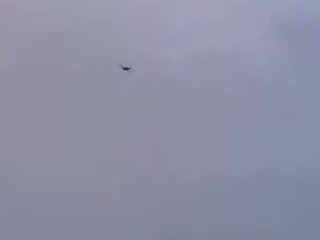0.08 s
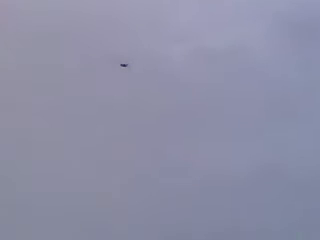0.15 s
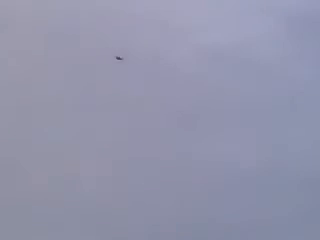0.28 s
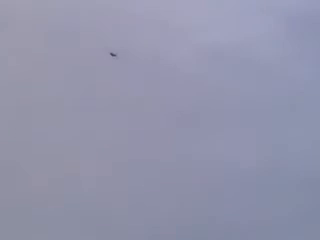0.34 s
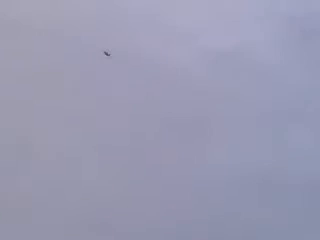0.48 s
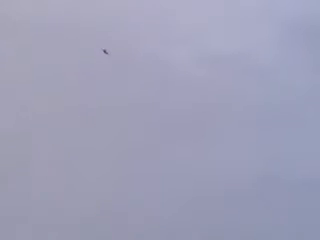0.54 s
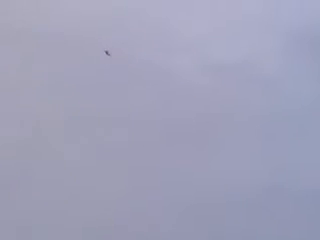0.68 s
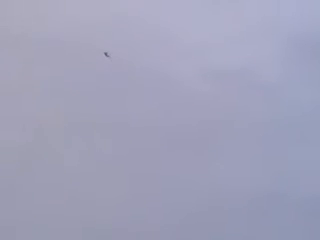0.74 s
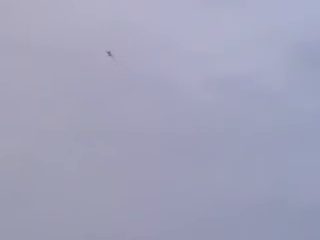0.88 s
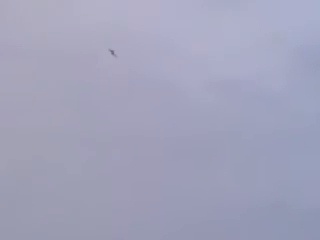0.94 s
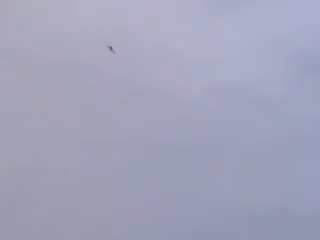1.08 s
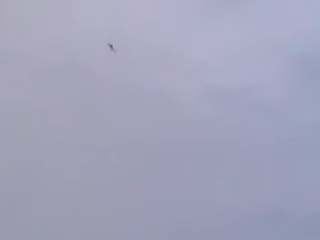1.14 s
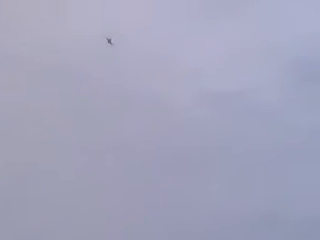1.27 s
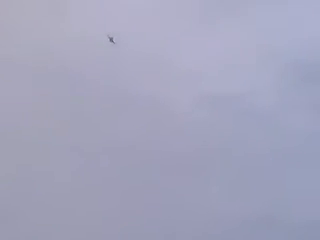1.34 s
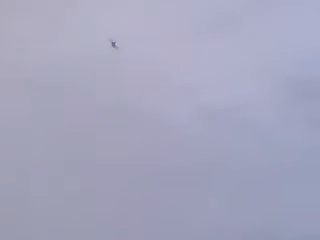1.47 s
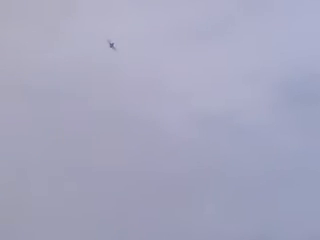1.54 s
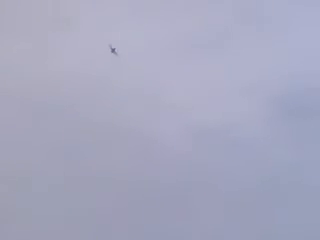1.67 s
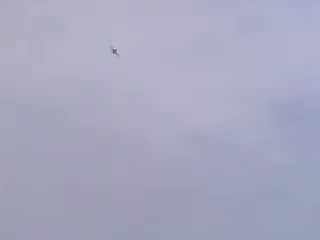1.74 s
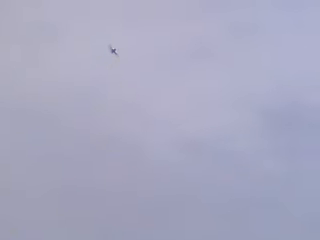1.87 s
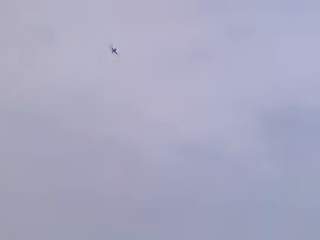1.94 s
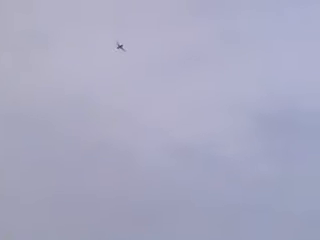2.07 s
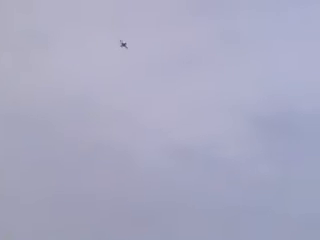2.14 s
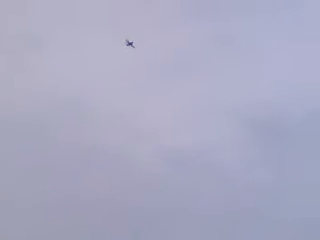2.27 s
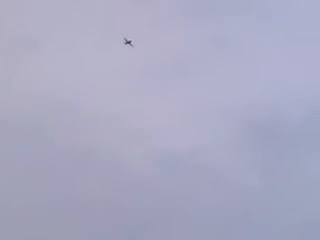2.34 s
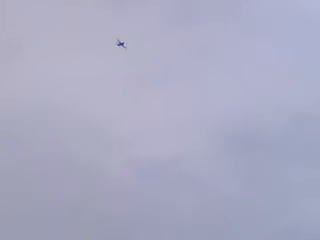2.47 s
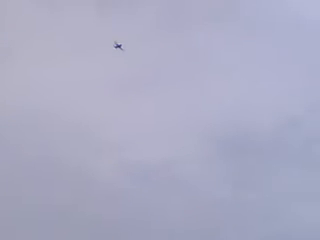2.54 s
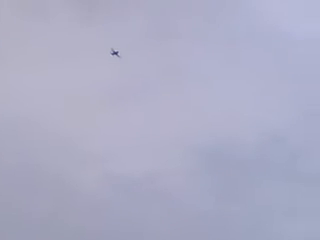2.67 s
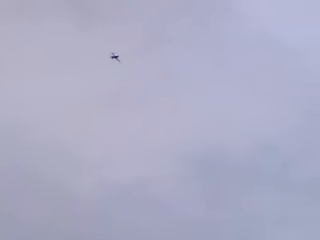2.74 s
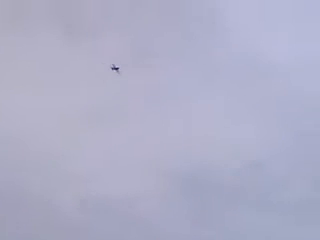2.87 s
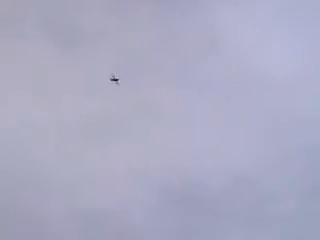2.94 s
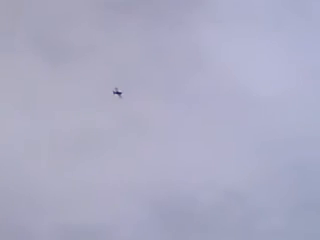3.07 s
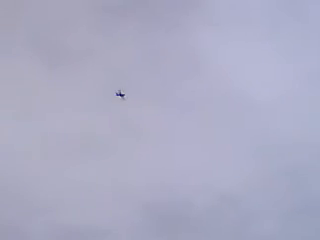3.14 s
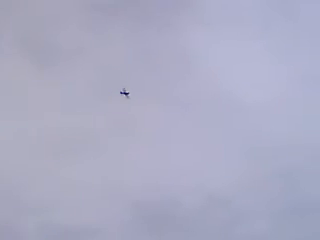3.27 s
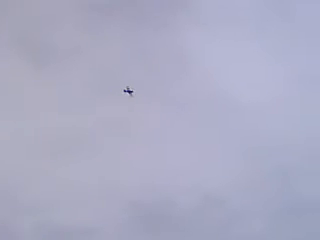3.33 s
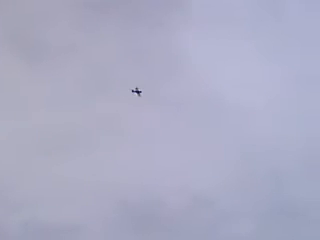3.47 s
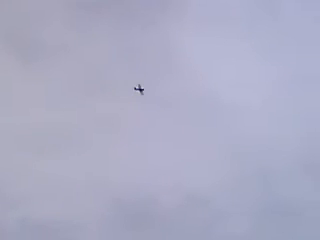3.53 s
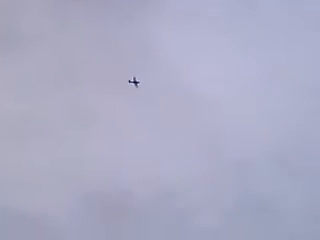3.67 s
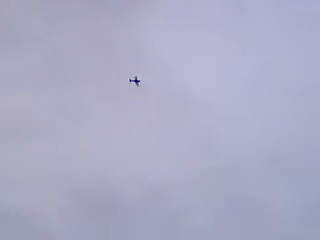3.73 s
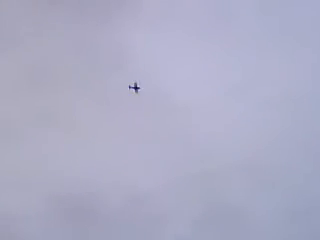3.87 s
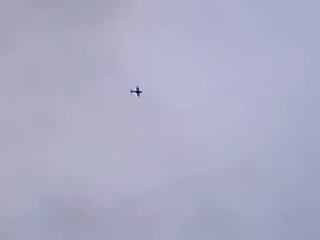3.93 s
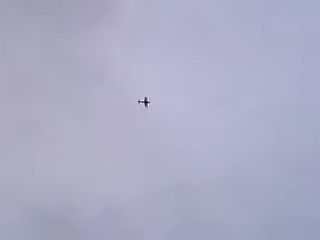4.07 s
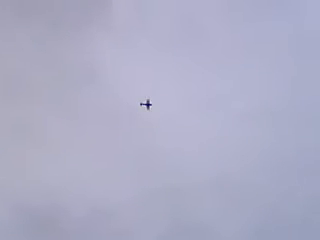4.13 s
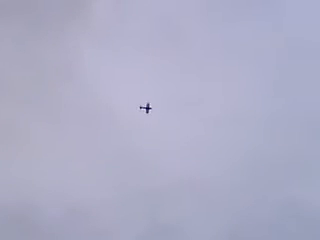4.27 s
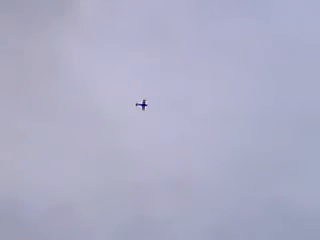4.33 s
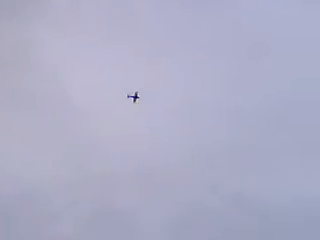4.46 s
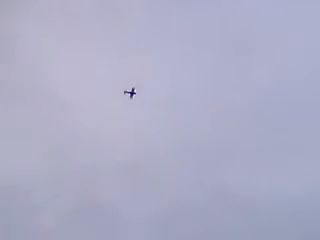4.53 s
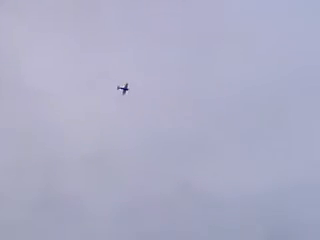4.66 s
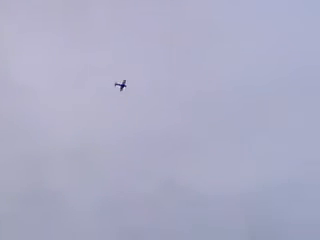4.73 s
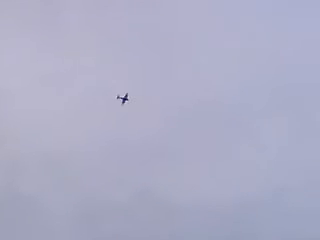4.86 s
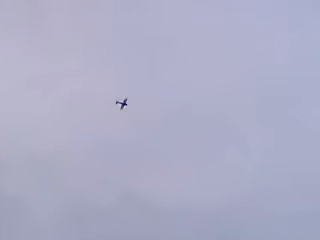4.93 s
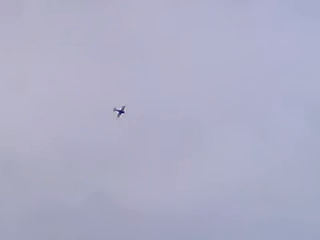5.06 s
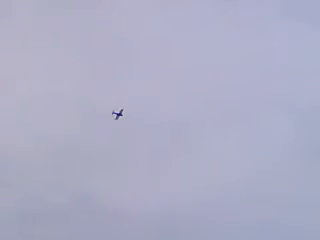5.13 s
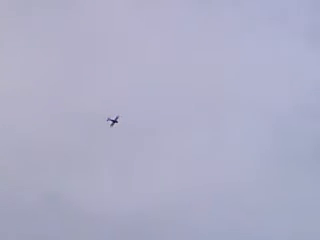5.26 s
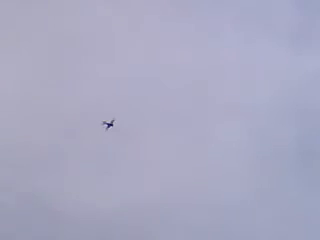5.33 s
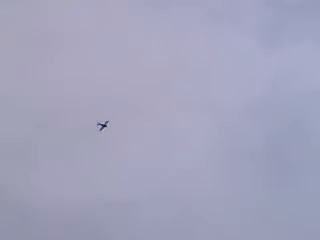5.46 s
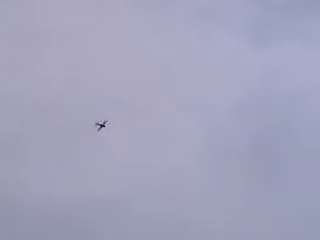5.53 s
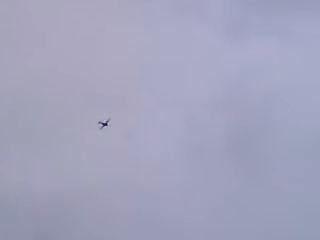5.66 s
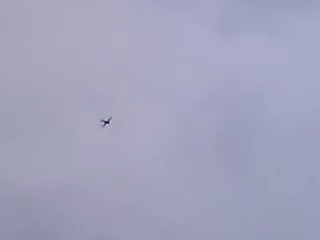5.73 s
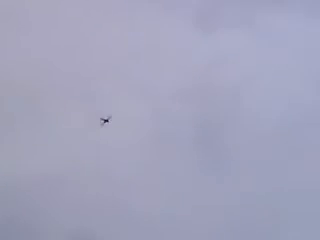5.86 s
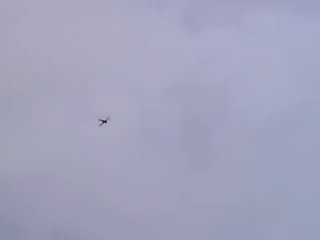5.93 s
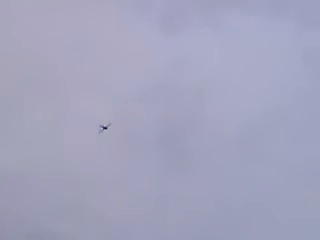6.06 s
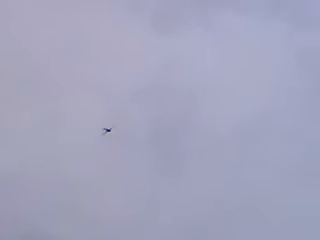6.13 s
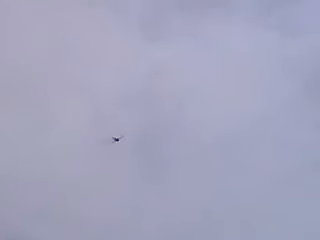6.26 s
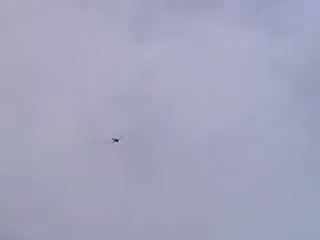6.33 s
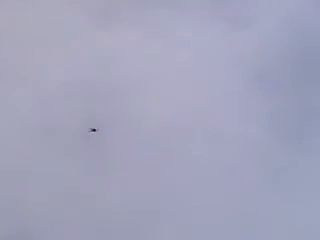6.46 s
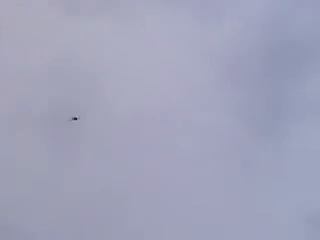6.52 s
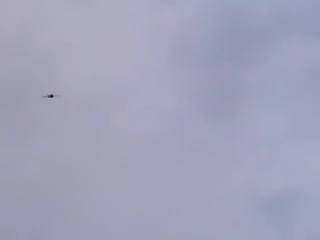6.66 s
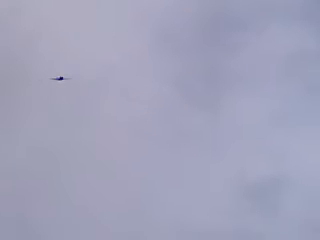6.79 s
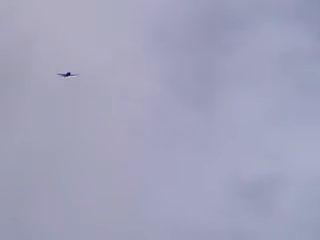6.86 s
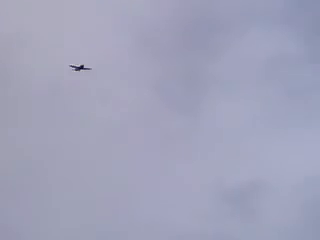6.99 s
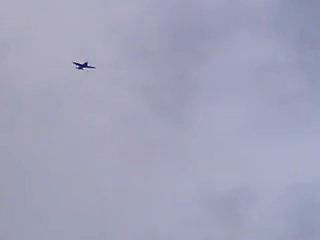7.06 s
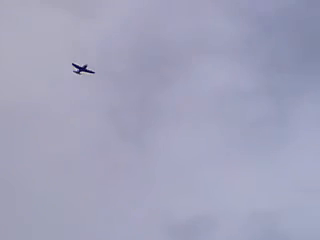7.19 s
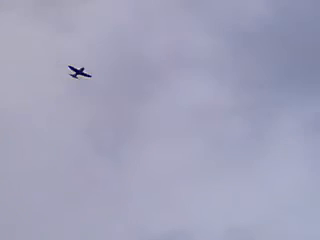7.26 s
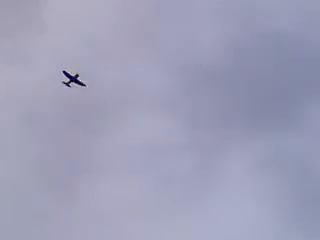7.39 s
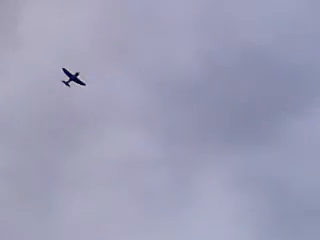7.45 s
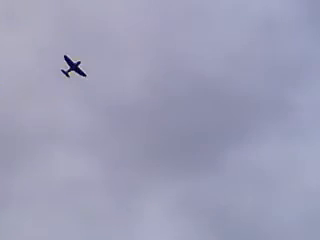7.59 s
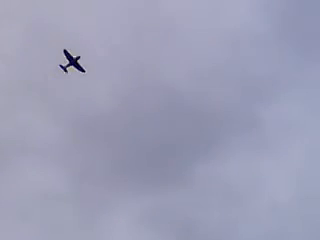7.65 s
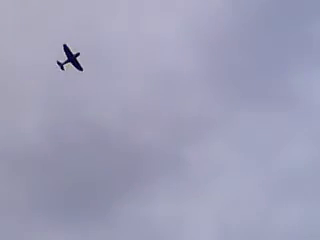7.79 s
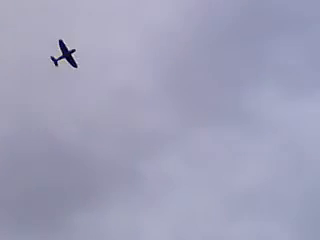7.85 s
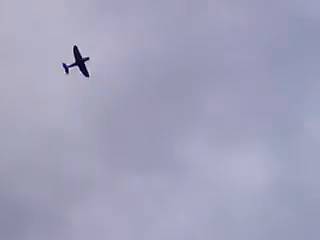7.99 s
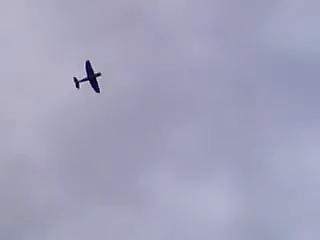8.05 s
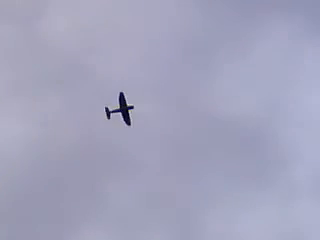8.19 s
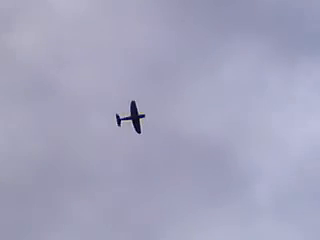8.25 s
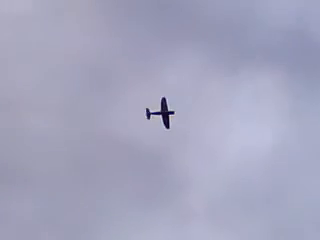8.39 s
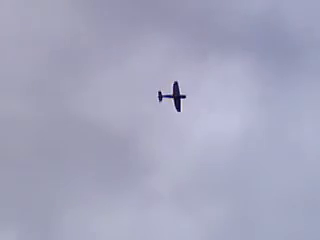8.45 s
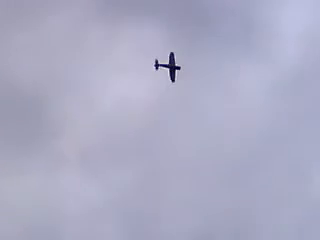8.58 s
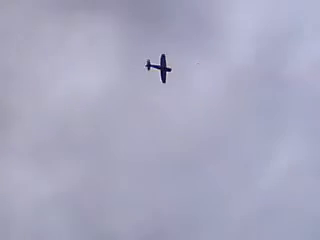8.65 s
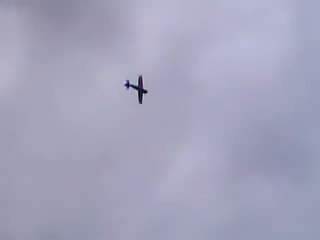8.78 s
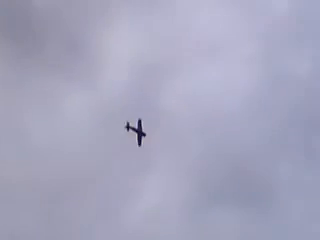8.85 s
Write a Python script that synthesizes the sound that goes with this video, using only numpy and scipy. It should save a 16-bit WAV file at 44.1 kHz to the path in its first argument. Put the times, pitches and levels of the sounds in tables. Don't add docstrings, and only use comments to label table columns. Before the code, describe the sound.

Outdoors over a field, a model aeroplane's tiny two-stroke engine drones throughout: a reedy, buzzing stack of tones with raspy exhaust hiss, firing around 130 times a second. At 0 s it is moderately loud, then fades quickly by 1.2 s while its pitch slides down, reaching its lowest near 3.6 s. From 2 to 5 s it is distant and thin, wavering in strength and brightness. Brief bright flashes flicker from about 4.8 to 6.8 s as pitch climbs, peaking near 7.5 s. It swoops overhead, loudest around 7.6-8.3 s, with a deep beat and propeller snarl near 8 s, then falls in pitch and eases until 8.9 s. A ground reflection gives a hollow, shifting comb colour. Wind thumps and flutters on the small camera microphone, strongest before 1.2 s and after 6.4 s, calmer between. Faint road hum continues, with a soft muffled car near 5.8 s. Treble is sparse and limited.

```python
import sys
import numpy as np
from scipy import signal
from scipy.fft import rfft, irfft, next_fast_len
from scipy.io import wavfile
from scipy.ndimage import uniform_filter1d, map_coordinates

SR = 44100
rng = np.random.default_rng(int(sys.argv[2]) if len(sys.argv) > 2 else 0)


def transcribe(signal):
    frames = np.atleast_2d(signal).T
    limited = np.clip(frames, -1, 1)
    pcm = np.round(limited * 32767).astype(np.int16)
    wavfile.write(sys.argv[1], SR, pcm)


def undo_db(level):
    steps = np.asarray(level, float) / 20
    return 10 ** steps


N = 392931


def unit(x):
    return x / np.sqrt(np.mean(x ** 2) + 1e-20)


def along(points, hz):
    f, v = np.transpose(points)
    return np.interp(np.log(hz + 1), np.log(f + 1), v)


def curves(rows):
    s, *cols = np.transpose(rows)
    return [np.interp(np.arange(N) / SR, s, c) for c in cols]


def wobble(rate):
    knots = rng.standard_normal(int(N * rate / SR) + 4)
    return map_coordinates(knots, [np.arange(N) * rate / SR], order=2)


def stretched(db, factor):
    return db.mean() + factor * (db - db.mean())


def filtered(x, response):
    m = next_fast_len(N + 8192)
    return irfft(rfft(x, m) * response(np.fft.rfftfreq(m, 1 / SR)), m)[:N]


def noise(spectrum):
    return unit(filtered(rng.standard_normal(N), lambda hz: undo_db(along(spectrum, hz))))


def swells(s, half_s, db):
    t = np.arange(0, N + 64, 64) / SR
    power = sum(undo_db(2 * d) * np.exp(-((t - c) / h) ** 2) for c, h, d in zip(s, half_s, db))
    return np.interp(np.arange(N) / SR, t, power)


def engine():
    # time in seconds, firing rate as heard in Hz, bent by the plane's speed.
    pitch = [(0.0, 136.4), (0.375, 134.7), (1.125, 132.2), (1.5, 131.3), (2.25, 128.6), (3.0, 127.7),
             (3.625, 126.6), (4.125, 128.5), (4.55, 131.0), (5.03, 132.0), (5.35, 134.6), (5.9, 143.5),
             (6.6, 153.9), (7.2, 160.7), (7.5, 162.3), (8.0, 157.4), (8.3, 152.4), (8.91, 140.5)]
    # time in seconds, loudness set by distance in dB, treble lift while the pipe faces the field in dB.
    flight = [(0.0, -34.5, 0.5), (0.9, -39, 5), (1.15, -45.5, 4), (1.5, -46, 5.5), (2.0, -45, -8),
              (2.4, -49, -8.5), (2.85, -46.5, 3), (3.6, -43, 2), (4.0, -40.5, -8), (4.45, -42, -6),
              (4.8, -38.5, -5), (5.25, -42.5, 3.5), (5.65, -40.5, -1), (6.3, -34.5, -2.5), (7.1, -32.5, -6),
              (7.6, -26.5, -2.5), (8.3, -25, -2), (8.91, -31.5, 4.5)]
    turns = np.cumsum(curves(pitch)[0] * (1 + 0.00071 * wobble(60))) / SR
    loud_db, lift_db = curves(flight)
    flash_db = pipe_flashes()
    buzz = shaft_orders(turns, loud_db, lift_db, flash_db)
    buzz = buzz + exhaust_hiss(turns, loud_db, lift_db + flash_db)
    return buzz + ground(buzz, soft_hz=2900) + np.sqrt(2) * drone(turns)


def pipe_flashes():
    # time in seconds, lift in dB.
    rolls = [(0.0, 5), (0.74, 2.5), (4.79, 5.5), (5.0, 5.5), (5.25, 4.5), (5.55, 6), (5.87, 7.5), (6.1, 3),
             (6.28, 4), (6.47, 4.5), (6.78, 3), (7.38, 2), (7.63, 0.5), (7.88, 4), (8.31, 3.5)]
    half_s = 0.051
    t = np.arange(N) / SR
    return sum(db * np.exp(-((t - s) / half_s) ** 2) for s, db in rolls)


def shaft_orders(turns, loud_db, lift_db, flash_db):
    # time in seconds, heading as a place between behind 0, side 1, ahead 2 and below 3.
    heading = [(1.9, 0.4), (2.8, 1.35), (4.6, 0.78), (5.9, 1.38), (6.5, 1.57), (7.2, 2), (7.6, 2.95)]
    # low, middle, whine and top order group in dB.
    group_db = [
        (6, -6.5, -0.4, -0.5),
        (3, -0.5, 1.2, -9.5),
        (0.7, 1.5, 0.4, -10.5),
        (0.5, -0.75, 0.2, -7),
    ]
    grows = [0.97, 1, 1.08, 1.177]
    lift_share = [.05, .3, .95, 1.05]
    flash_share = [.05, .2, .45, 1.3]
    top_order = 50
    ticks = np.arange(0, N, 64)
    t = ticks / SR
    aspect = curves(heading)[0][ticks]

    levels_db = []
    for grow, lift, flash, by_heading in zip(grows, lift_share, flash_share, np.transpose(group_db)):
        db = stretched(loud_db, grow) + lift * lift_db + flash * flash_db + 1.24 * wobble(16)
        levels_db.append(db[ticks] + np.interp(aspect, np.arange(len(by_heading)), by_heading))
    dip_s, dip_lasts_s, dip_db = 5.66, 0.14, -14
    levels_db[0] = levels_db[0] + dip_db * np.exp(-((t - dip_s) / dip_lasts_s) ** 2)
    disc_s, disc_takes_s, swing_db = 7.8, 0.1, 5
    odd_db = -swing_db * np.clip(aspect - 2, 0, 1) * np.tanh((t - disc_s) / disc_takes_s)

    knots = rng.standard_normal((top_order + 1, 200))
    tone = np.zeros(N)
    for k in range(3, top_order + 1):
        group = np.searchsorted([5, 12, 18], k)
        flicker = map_coordinates(knots[k], [t * 8])
        db = levels_db[group] + order_db(k, aspect) + (1.0 + 0.035 * k) * flicker
        if k in (7, 9, 11, 13):
            db = db + odd_db
        phase = 0.8 * knots[k, -1] + 0.006 * k * k
        level = np.interp(np.arange(N), ticks, np.sqrt(2) * undo_db(db))
        tone += level * np.sin(2 * np.pi * k * turns - phase)
    return tone


def order_db(k, aspect):
    orders_db = [
        (-17.5, -17.5, -25, -4.0, -13.5, -11.5, -12.5, -12.5, -7.5, -27, -17.5, -12, -7.5, -4.5, -9.0, -16.5, -10.5, -8, -11, -9, -12, -13.5, -18, -23.5, -19.0, -22, -17.5, -12),
        (-0.5, -12, -16, -9.0, -16.5, -7.0, -9.0, -7, -19.5, -30, -16, -21.5, -12, -2.5, -4.5, -18, -8.5, -11.5, -12, -8.5, -11, -10.5, -8, -13.5, -14.5, -15, -11, -16.5),
        (-6.5, -6, -7.5, -6.5, -10.5, -4.5, -23, -16.5, -17.0, -18.5, -18, -1, -6.0, -10.5, -17.5, -21.5, -8.5, -5.5, -8.5, -11.5, -16.5, -8.5, -14.5, -14.5, -13.5, -16.5, -14.5, -15),
        (-13, -22.0, -16, -7.5, -13.5, -6.5, -12.5, -8, -19.5, -13, -18.5, -5.5, -11, -11, -15.5, -17.0, -8.5, -11, -14, -10.5, -10.5, -13.5, -13.0, -12.5, -22, -11, -4.5, -20.5),
    ]
    # centre order, width in orders, level in dB.
    rings = [(31, 1.1, -17), (36.7, .8, -17), (40.5, 1.2, -27), (44, .8, -24)]
    if k < 3 + len(orders_db[0]):
        return np.interp(aspect, np.arange(len(orders_db)), np.transpose(orders_db)[k - 3])
    k = k * (1 + 0.04 * np.clip(aspect - 2, 0, 1))
    power = sum(undo_db(2 * db) / (1 + ((k - c) / w) ** 4) for c, w, db in rings)
    return 10 * np.log10(power + undo_db(2 * -33))


def exhaust_hiss(turns, loud_db, treble_db):
    # frequency in Hz, level in dB per Hz.
    hiss = [(800, -30.5), (1600, -1), (2300, -4.5), (3500, -6), (4500, -4), (5500, -12.5), (7000, -13.5)]
    puff = 1 + 0.8 * np.cos(2 * np.pi * turns)
    whine_db = loud_db + 0.68 * treble_db
    hiss_db = stretched(whine_db, 1.23) - 13.5
    return undo_db(hiss_db + 5.0) * unit(puff * noise(hiss))


def drone(turns):
    # time in seconds, exhaust beat in dB, heard once the plane is overhead.
    beat = [
        (0, -48),
        (6.9, -44.5),
        (7.2, -31),
        (7.5, -26),
        (8.91, -32),
    ]
    # time in seconds, propeller tone in dB.
    blades = [(0.0, -26.5), (0.8, -28.5), (1.8, -36), (2.3, -42.5), (3.1, -48), (4.0, -38.5), (4.6, -42.5),
              (4.8, -61), (5.2, -38), (6.0, -30.5), (6.8, -34), (7.15, -42), (7.6, -40), (8.0, -32.5),
              (8.35, -34.5), (8.6, -35), (8.91, -34)]
    # time in seconds, half length in seconds, tone four times a turn in dB.
    snarl = [
        (5.05, 0.23, -42),
        (7.978, 0.19, -27.5),
    ]
    low = undo_db(curves(beat)[0]) * np.sin(2 * np.pi * turns)
    low = low + undo_db(curves(blades)[0]) * np.sin(4 * np.pi * turns)
    return low + np.sqrt(swells(*np.transpose(snarl))) * np.sin(8 * np.pi * turns)


def ground(direct, soft_hz):
    # time in seconds, lag of the ground path in ms.
    ground_lag = [(0.0, 3.42), (0.75, 3.48), (1.9, 3.78), (2.4, 3.9), (3.0, 4.18), (4.4, 4.18),
                  (5.35, 4.08), (5.8, 3.94), (6.35, 4.02), (6.85, 3.93), (7.3, 4.05), (7.55, 4.24),
                  (7.75, 4.57), (8.1, 5.06), (8.55, 5.58), (8.91, 5.64)]
    lag = curves(ground_lag)[0] * SR / 1000
    late = map_coordinates(direct, [np.arange(N) - lag], order=3)
    return 0.95 * filtered(late, lambda f: 1 / (1 + (f / soft_hz) ** 2))


def wind():
    # time in seconds, half length in seconds, rumble peak in dB, flutter peak in dB.
    gusts = [(0.144, .06, -21.5, -26.5), (0.569, 0.032, -18, -25.5), (0.78, 0.11, -21.5, -27),
             (0.885, .03, -18, -38.5), (1.096, 0.057, -18.5, -26.5), (1.79, 0.09, -26, -38.5),
             (2.113, 0.041, -26, -40.5), (2.6, 0.084, -35.5, -53), (3.138, 0.039, -27.5, -49),
             (3.446, 0.036, -28, -36), (3.583, 0.028, -22, -32), (3.837, .15, -22.5, -33.5),
             (4.254, 0.11, -28, -36.5), (4.584, 0.11, -28, -43.5), (5.07, 0.055, -30.5, -41),
             (5.65, 0.1, -34.5, -52), (6.437, 0.064, -21, -28.5), (6.623, 0.032, -25, -26.5),
             (6.741, .04, -18, -29), (7.044, 0.099, -21.5, -29), (7.386, 0.026, -23, -36.5),
             (7.55, .08, -21.5, -37), (7.857, 0.079, -18.5, -30), (7.99, .03, -20.5, -36),
             (8.214, 0.064, -21, -26.5), (8.396, 0.054, -21.5, -29.5), (8.48, 0.029, -25, -28),
             (8.658, 0.15, -24, -26), (8.91, 0.044, -17, -23), (0.4, .1, -26.5, -44)]
    # rumble in dB, flutter in dB.
    calm_db = [-33.5, -49.5]
    # frequency in Hz, level in dB per Hz.
    rumble_spectrum = [(15, -17), (30, -4), (60, -1.7), (100, -5), (150, -13), (250, -26), (500, -49.5)]
    # frequency in Hz, level in dB per Hz.
    flutter_spectrum = [(60, -31), (120, 0), (200, -2.5), (300, -8), (450, -15), (700, -22), (1200, -36.5),
                        (2500, -68)]
    s, half_s, *peaks_db = np.transpose(gusts)
    slow, quick = [np.sqrt(swells(s, half_s, db) + undo_db(2 * calm)) for db, calm in zip(peaks_db, calm_db)]
    eddies = wobble(30)
    rumble = slow * unit(undo_db(1.5 * eddies) * noise(rumble_spectrum))
    lumps = undo_db(1.7 * eddies + 2.3 * wobble(70))
    flutter = quick * undo_db(5.0) * unit(lumps * noise(flutter_spectrum))
    return rumble + flutter


def road():
    # frequency in Hz, level in dB per Hz.
    tyres = [(150, -28), (300, -17), (600, -5.5), (1050, 3), (1500, -3), (2200, -9.5), (3500, -23),
             (5000, -21.5), (7000, -29.5)]
    start_db, rise_db, rise_s = -41, 3.5, 1.37
    car_s, car_lasts_s, car_db, car_top_hz = 5.76, 0.17, -32, 1700
    t = np.arange(N) / SR
    db = start_db + rise_db / (1 + np.exp(2 * (rise_s - t)))
    far = undo_db(db + 1.5 + 0.48 * wobble(5)) * noise(tyres)
    car = filtered(noise(tyres), lambda f: 1 / (1 + (f / car_top_hz) ** 4))
    return far + np.sqrt(swells([car_s], [car_lasts_s], [car_db])) * car


def scene():
    return (engine() + wind() + road())[None]


def thinned_treble(x, from_hz, coarse):
    hz, t, z = signal.stft(x, SR, window="cosine", nperseg=2816)
    hz, size = hz[:, None], np.abs(z)
    bands = rng.random((len(hz) // 8 + 1, len(t)))
    bands = np.repeat(bands, 8, axis=0).repeat(2, axis=1)[:len(hz), :len(t)]
    need = np.clip(hz / from_hz - 1, 0, 1)
    around = uniform_filter1d(size, 33, axis=0)
    keep = (size > coarse * need * (0.4 + bands) * around) & (bands > 0.07 * need)
    top, spill = np.repeat(rng.random((2, len(t))), 3, axis=1)[:, :len(t)]
    busy = size[hz[:, 0] > from_hz].mean(0)
    busy = np.clip(np.log2(busy / np.median(busy)) / 2, 0, 1)
    below_top = hz < 6950 + 350 * top - 150 * busy
    spilled = (hz > 7600) & (spill < 0.95 - 0.7 * busy)
    keep &= below_top | spilled
    return signal.istft(z * keep, SR, window="cosine", nperseg=2816)[1][:N]


def low_pass(x):
    return signal.sosfilt(signal.butter(12, 8180, fs=SR, output="sos"), x)


def record(dry):
    # frequency in Hz, response in dB.
    lens = [(6600, -0.9), (7000, -6.5), (7350, -8), (7500, -17.5), (8200, -21), (8800, -53.5), (9200, -74)]
    heard = filtered(dry[0], lambda hz: undo_db(along(lens, hz)))
    mix = thinned_treble(heard, from_hz=2300, coarse=1.0)[None]
    return low_pass(mix)


dry = scene()
out = record(dry)
transcribe(out)
```